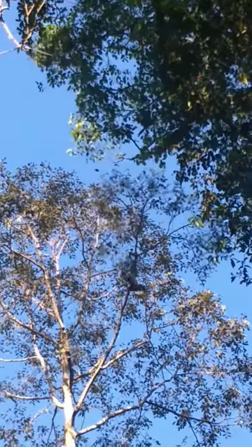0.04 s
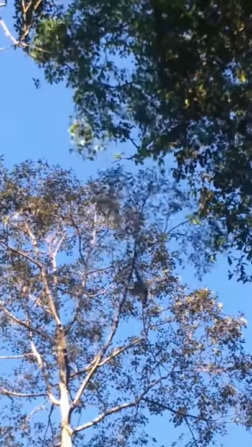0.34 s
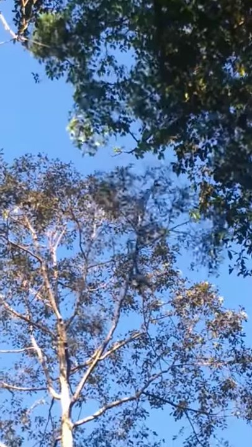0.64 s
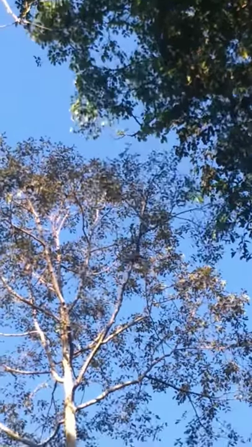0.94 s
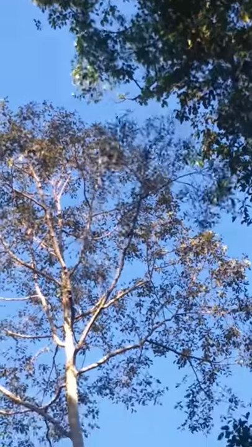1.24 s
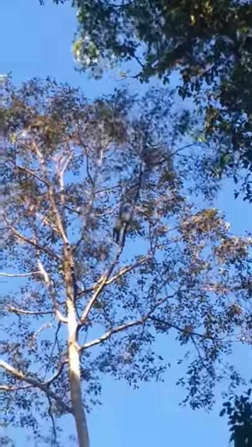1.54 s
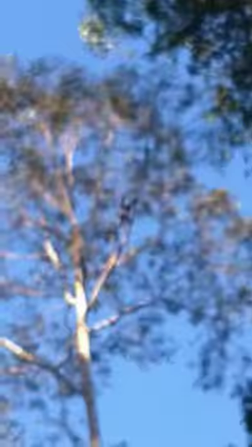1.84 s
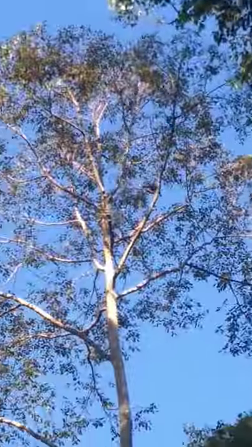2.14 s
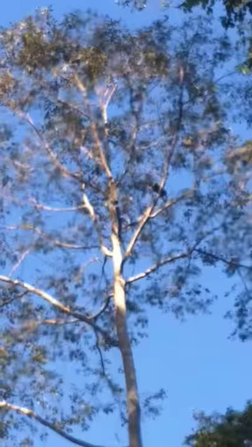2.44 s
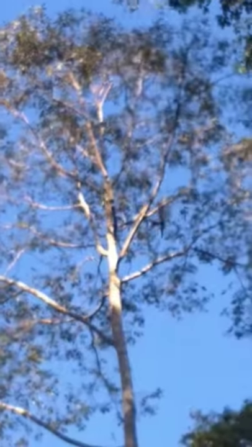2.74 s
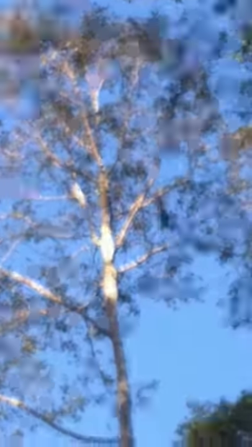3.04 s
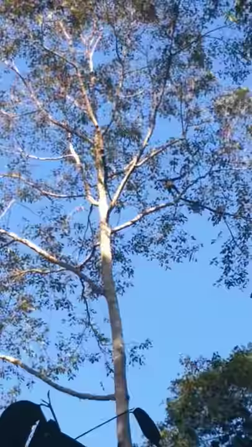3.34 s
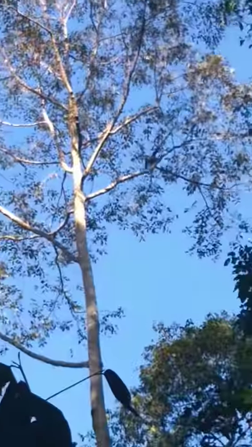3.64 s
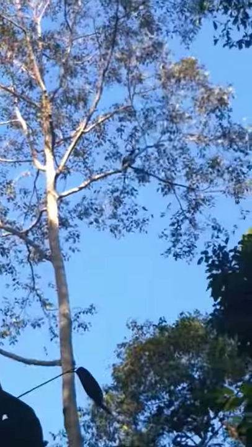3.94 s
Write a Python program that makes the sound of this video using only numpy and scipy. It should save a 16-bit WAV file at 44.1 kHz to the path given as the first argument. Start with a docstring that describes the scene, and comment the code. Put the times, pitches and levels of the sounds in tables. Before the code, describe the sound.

A dense, high cicada drone, near and far, grows fuller and then holds steady among tropical trees. Soft rustling and scraping in the undergrowth give way to light twig snaps and one dry handling click at the microphone.

```python
"""A tropical forest, droning with cicadas: each clicks its ribbed drums some 200 times a second,
ringing its body, and throbs about 8 times a second. One sings close by and a few further off, one of
them wavering; a chorus and a latecomer swell during the first second. Below lie a faint hush,
crickets, dull rustles, hollow tones, scrapes and twig ticks. The two microphone channels are out of
step; near the end the camera's shell clicks once in both."""
import sys
import numpy as np
from scipy.fft import rfft, irfft, next_fast_len
from scipy.io import wavfile
from scipy.ndimage import map_coordinates

SR = 44100
rng = np.random.default_rng(int(sys.argv[2]) if len(sys.argv) > 2 else 0)


def output_pcm(signal):
    """Save a mono or channel-first signal as 16-bit PCM at the path in sys.argv[1].

    Samples are clipped to [-1, 1] before scaling.
    """
    pcm = np.clip(np.atleast_2d(signal).T, -1, 1) * 32767
    wavfile.write(sys.argv[1], SR, np.round(pcm).astype(np.int16))


N = 176400


def amp(db):
    """Decibels to gain."""
    return 10 ** (np.asarray(db) / 20)


def unit(x):
    """Scale to rms 1."""
    return x / np.sqrt(np.mean(x ** 2) + 1e-20)


def along(points, hz):
    """Interpolate (freq_hz, value) points on a log axis."""
    freqs, values = np.transpose(points)
    return np.interp(np.log(hz + 1), np.log(freqs + 1), values)


def clock():
    """Sample times in seconds."""
    return np.arange(N) / SR


def curve(rows):
    """Interpolate (time_s, value) points at every sample."""
    return np.interp(clock(), *np.transpose(rows))


def wobble(rate_hz):
    """Smooth random curve, rate_hz knots a second."""
    return map_coordinates(rng.standard_normal(4096), [clock() * rate_hz + 2], mode="mirror")


def decay(age_s, t60_s):
    """Exponential decay, floored at -120 dB."""
    return amp(-60 * np.minimum(age_s / t60_s, 2))


def filtered(x, response):
    """Apply a complex frequency response."""
    size = next_fast_len(N + SR // 2)
    return irfft(rfft(x, size) * response(np.fft.rfftfreq(size, 1 / SR)), size)[..., :N]


def coloured(x, spectrum):
    """Shape by (freq_hz, gain_db) points; rms 1."""
    return unit(filtered(x, lambda hz: amp(along(spectrum, hz))))


def resonant(x, centre_hz, width_hz):
    """Two identical band-passes in series."""
    def band(hz):
        return 1j * hz * width_hz / (centre_hz ** 2 - hz * hz + 1j * hz * width_hz)
    return filtered(x, lambda hz: band(hz) ** 2)


def noise():
    """White noise: the part both channels share, and the part in which they differ."""
    return rng.standard_normal((2, N))


def forest(x, wet_db, t60_s=.4):
    """Direct sound plus scatter from trunks and leaves: shared and differing parts, each at rms 1."""
    t = np.arange(SR // 2) / SR
    tail = rng.standard_normal((2, len(t))) * amp(-60 * t / t60_s)
    tail /= np.linalg.norm(tail[0])
    wet = irfft(rfft(x) * rfft(tail, N), N)
    return np.array([unit(x + amp(wet_db) * wet[0]), unit(wet[1])])


def drum_clicks(rate_hz, envelope, jitter_s=4e-6, spread_db=1.3):
    """Clicks of a cicada's ribbed drums, slightly uneven in time and strength."""
    cycles = rng.random() + np.cumsum(rate_hz) / SR
    timing, force = rng.standard_normal((2, 2048))
    at = np.interp(np.arange(1, int(cycles[-1])), cycles, np.arange(N))
    at = np.clip(at + jitter_s * SR * timing[:len(at)], 0, N - 1)
    taps = at.astype(int)[:, None] + np.arange(-7, 9)
    offset = taps - at[:, None]
    pulse = np.sinc(offset) * np.cos(np.pi * offset / 16) ** 2  # lands between samples
    strength = envelope[at.astype(int)] * amp(spread_db * force[:len(at)])
    return np.bincount((taps % N).ravel(), (pulse * strength[:, None]).ravel(), N)


def singer(rate_hz, drift=.002, throb_hz=7.8, depth_db=1.45, bend=.0007):
    """One cicada's clicks: each throb makes them louder and a little faster."""
    cycles = throb_hz * rng.uniform(.9, 1.1) * clock() + rng.random() + .13 * wobble(1.97)
    throb = np.sin(2 * np.pi * cycles)
    return drum_clicks(rate_hz * (1 + bend * throb + drift * wobble(5)), amp(depth_db * throb))


def crowd(spectrum, count, speedup_per_s=.004):
    """Several insects at their own click rates, all slowly speeding up."""
    rates_hz = rng.uniform(195, 265, count)
    speedup = 1 + speedup_per_s * clock()
    voices = sum(forest(singer(hz * speedup), wet_db=3) for hz in rates_hz)
    return coloured(voices, spectrum)


# Throbs: peak_s, relative_db
NEAR_THROBS = [(0.056, -38.0), (0.165, -39.8), (0.294, -37.5), (0.415, -37.9), (0.587, -38.3),
               (0.708, -38.9), (0.802, -38.2), (0.931, -36.3), (1.058, -37.6), (1.168, -38.6),
               (1.317, -39.1), (1.448, -38.5), (1.575, -36.7), (1.71, -38.5), (1.843, -38.4),
               (1.982, -37.3), (2.088, -36.8), (2.22, -40.7), (2.374, -40.1), (2.482, -39.1),
               (2.617, -39.4), (2.743, -38.9), (2.867, -39.5), (3.006, -38.7), (3.116, -38.9),
               (3.284, -35.8), (3.411, -38.4), (3.507, -37.8), (3.652, -38.4), (3.774, -36.8),
               (3.943, -37.1)]
# Click rate: time_s, rate_hz
NEAR_RATE = [(0, 241.4), (4, 242.0)]


def near_cicada(throb_width_s=.026, boost_db=2.5, floor_db=-40, bend=.0025):
    """Clicks drive a nearly pure body ring that swells and bends up with each throb."""
    humps = [np.exp(-.5 * ((clock() - peak_s) / throb_width_s) ** 2) for peak_s, _ in NEAR_THROBS]
    throbs = sum(hump * amp(db + boost_db) for hump, (_, db) in zip(humps, NEAR_THROBS))
    envelope = np.hypot(amp(floor_db), throbs)
    rate_hz = curve(NEAR_RATE) * (1 + bend * (sum(humps) - .7))
    ring = resonant(drum_clicks(rate_hz, envelope), centre_hz=5591, width_hz=160)
    return np.sqrt(np.mean(envelope ** 2)) * forest(ring, wet_db=-16)


# Click rates, one row per cicada: start_hz, end_hz
CLICK_RATES = [(220.8, 224.8), (269.5, 269.3), (211.9, 212.9), (219.0, 223.2)]
# Rate wander, same order: drift_fraction
RATE_DRIFTS = [.0016, .001, .0013, .0028]
# Bodies, same order: resonance_hz, width_hz, level_db
BODIES = [(5320, 120, -46), (5480, 230, -46.5), (5503, 170, -43), (6447, 540, -39)]


def neighbours():
    """Four cicadas in nearby trees, each ringing its own body."""
    out = np.zeros((2, N))
    for (start_hz, end_hz), drift, (hz, width_hz, db) in zip(CLICK_RATES, RATE_DRIFTS, BODIES):
        clicks = singer(np.linspace(start_hz, end_hz, N), drift)
        out += amp(db) * forest(resonant(clicks, hz, width_hz), wet_db=4)
    return out


# Centre click rate: time_s, rate_hz
WAVERING_RATE = [(0, 235.6), (1.2, 236.1), (2.4, 237.6), (4, 237.6)]


def wavering_cicada(swing_fraction=.005, period_s=.507, crest_s=.45):
    """The click rate swings twice a second, carrying the ringing tones along."""
    swing = swing_fraction * np.cos(2 * np.pi * (clock() - crest_s) / period_s)
    clicks = singer(curve(WAVERING_RATE) * (1 + swing))
    return amp(-36) * forest(resonant(clicks, centre_hz=6412, width_hz=790), wet_db=4)


# Chorus swell: time_s, level_db
CHORUS_SWELL = [(0, -48), (.55, -50), (.85, -37.5), (1.5, -37.5), (2.5, -36.5), (4, -35.5)]
# Chorus colour: freq_hz, gain_db
CHORUS_SPECTRUM = [(3500, -58), (4600, -65), (5100, -18.5), (5400, -6), (5650, -13.5), (5900, -19),
                   (6200, -1.5), (6500, 3), (6800, -10.5), (7200, -13), (7800, -19), (8600, -28),
                   (10000, -37), (12000, -61)]


def chorus():
    """Massed cicadas swell during the first second."""
    return amp(curve(CHORUS_SWELL)) * crowd(CHORUS_SPECTRUM, count=4)


# Buzz colour: freq_hz, gain_db
BUZZ_SPECTRUM = [(7500, -69), (8800, -3.5), (9250, -4), (9550, 0), (9900, -8), (10500, -9.5), (11100, -10),
                 (11800, -36), (15000, -39)]


def buzzers():
    """Clicking insects with a thin, higher buzz."""
    return amp(-46.5) * crowd(BUZZ_SPECTRUM, count=4)


# Hiss colour: freq_hz, gain_db
FAR_SPECTRUM = [(2500, -83), (4200, -13), (4900, -17.5), (5500, 7), (6500, -4.5), (7500, -5.5),
                (8700, -7.5), (10200, -5.5), (11300, -17.5), (12500, -20.5), (13500, -23), (15500, -28)]


def far_insects(level_db=-40.5, flicker_db=.32):
    """Countless far insects blur into a hiss."""
    return amp(level_db + flicker_db * wobble(17)) * coloured(noise(), FAR_SPECTRUM)


# Hush colour: freq_hz, gain_db
HUSH_SPECTRUM = [(20, 2), (45, -15), (66, 8), (88, -1), (115, -0.5), (170, -2), (300, -2.5), (500, -2.5),
                 (800, -0.5), (1300, -4), (1800, -8.5), (2500, -9), (4200, -10), (6000, -9.5), (15000, -35)]


def hush(level_db=-53, flicker_db=.8):
    """Faint, broad forest noise."""
    return amp(level_db + flicker_db * wobble(25.12)) * coloured(noise(), HUSH_SPECTRUM)


# Insect whine: time_s, pitch_hz, level_db
WHINE_TRACK = [(0, 9570, -59), (1.9, 9560, -57), (2.1, 9490, -55.5), (2.4, 9480, -56), (2.6, 9470, -68),
               (4, 9470, -74)]


def whine():
    """One insect holds a thin, slowly sinking tone, then fades."""
    time_s, hz, db = np.transpose(WHINE_TRACK)
    pitch_hz = np.interp(clock(), time_s, hz) * (1 + .000675 * wobble(18))
    tone = np.sin(2 * np.pi * np.cumsum(pitch_hz) / SR)
    return amp(np.interp(clock(), time_s, db)) * forest(tone, wet_db=14)


# Cricket tones: pitch_hz, level_db
CRICKET_TONES = [(4447, -57), (4780, -62.5)]


def crickets():
    """Distant crickets: faint, unsteady tones pitched below the cicadas."""
    return sum(amp(db) * unit(resonant(noise(), hz, width_hz=55)) for hz, db in CRICKET_TONES)


# Rustle envelope: time_s, level_db
RUSTLE_ENVELOPE = [(0, -44), (.08, -45.5), (.13, -42), (.27, -44), (.33, -44.5), (.43, -49), (.49, -45),
                   (.55, -57), (.61, -56.5), (.66, -46.5), (.71, -50), (.77, -66), (.88, -54.5),
                   (1.15, -76), (2, -68), (2.3, -56), (2.8, -57.5), (3.2, -63), (4, -71)]
# Rustle colour: freq_hz, gain_db
RUSTLE_SPECTRUM = [(100, -33), (300, -13.5), (500, -6.5), (750, -2), (1050, -1), (1500, -8), (2000, -12),
                   (2800, -17.5), (4000, -19.5), (8000, -49)]


def rustles():
    """Dull, crumbly rustling: noise with a fast-flickering level."""
    grains = noise() * amp(1.06 * wobble(110) + .86 * wobble(400))
    return amp(curve(RUSTLE_ENVELOPE)) * coloured(grains, RUSTLE_SPECTRUM)


# Tones in the rustling: centre_s, length_s, start_hz, end_hz, level_db
HOLLOW_TONES = [(.235, .13, 845, 755, -42), (.225, .17, 640, 675, -48.5), (.42, .12, 735, 860, -44),
                (.565, .05, 660, 675, -52), (.915, .13, 670, 640, -58), (1.035, .19, 640, 600, -57),
                (1.17, .1, 585, 565, -63)]


def hollow_tones(waver_fraction=.015, breakup_db=3):
    """Short, broken, gliding tones, blurred by the trees."""
    out = np.zeros(N)
    for centre_s, length_s, start_hz, end_hz, db in HOLLOW_TONES:
        progress = np.clip((clock() - centre_s) / length_s + .5, 0, 1)
        pitch_hz = (start_hz + (end_hz - start_hz) * progress) * (1 + waver_fraction * wobble(132))
        envelope = amp(db + breakup_db * wobble(71.4)) * np.sin(np.pi * progress)
        out += envelope * np.sin(2 * np.pi * np.cumsum(pitch_hz) / SR)
    return out.std() * forest(out, wet_db=-4)


# Drags: peak_s, rise_s, fall_s, level_db
SCRAPE_STROKES = [(0.485, 0.028, 0.028, -48), (1.71, .11, 0.065, -48.5)]
# Scrape colour: freq_hz, gain_db
SCRAPE_SPECTRUM = [(120, -23), (280, 1), (450, -1), (900, -1.5), (1200, 2), (1430, 7), (1700, -3.5),
                   (2200, -3), (4000, -15), (8000, -46)]


def scrapes():
    """Something drags softly through the undergrowth, twice."""
    t = clock()
    envelope = np.zeros(N)
    for peak_s, rise_s, fall_s, db in SCRAPE_STROKES:
        width_s = np.where(t < peak_s, rise_s, fall_s)
        envelope += amp(db) * np.exp(-.5 * ((t - peak_s) / width_s) ** 2)
    return envelope * coloured(noise() * amp(.94 * wobble(140)), SCRAPE_SPECTRUM)


# Click rate: time_s, rate_hz
LATECOMER_RATE = [(0, 197.0), (1.2, 197.8), (1.8, 198.9), (2.4, 199.6), (4, 200.4)]
# Entry swell: time_s, level_db
LATECOMER_SWELL = [(0, -60), (.55, -59), (.85, -37), (2.2, -40.5), (4, -38.5)]
# Song colour: freq_hz, gain_db
LATECOMER_SPECTRUM = [(4000, -53), (5000, -16.5), (5700, -5.5), (6100, -6.5), (6400, -0.5), (6750, -4.5),
                      (7000, -7), (7400, -9), (8000, -15.5), (9000, -26), (12000, -43)]


def latecomer():
    """A slower-clicking, brighter cicada joins in and holds steady tones."""
    clicks = singer(curve(LATECOMER_RATE), drift=.0017)
    return amp(curve(LATECOMER_SWELL)) * coloured(forest(clicks, wet_db=4), LATECOMER_SPECTRUM)


# Twigs: start_s, level_db, resonance_hz, width_hz, t60_s
TWIG_TICKS = [(2.228, -45, 990, 900, 0.044), (2.269, -34, 1490, 2570, 0.027),
              (2.371, -42, 1540, 2220, 0.07), (2.45, -40.5, 1260, 420, 0.057),
              (2.565, -48, 1190, 1200, 0.04), (2.728, -40.5, 1540, 2080, 0.054),
              (3.089, -45, 1290, 900, 0.034)]


def twig_ticks(snap_db=-1, attack_s=.00012):
    """Twigs give way: a brief snap and a short woody ring."""
    out = np.zeros((2, N))
    for start_s, db, hz, width_hz, t60_s in TWIG_TICKS:
        age_s = np.maximum(clock() - start_s, 0)
        ring = decay(age_s, t60_s) * unit(resonant(noise(), hz, width_hz))
        snap = decay(age_s, t60_s=.008) * unit(resonant(noise(), centre_hz=2370, width_hz=3800))
        out += amp(db) * (1 - np.exp(-age_s / attack_s)) * (ring + amp(snap_db) * snap)
    return out


# Click colour: freq_hz, gain_db
SHELL_SPECTRUM = [(300, -20), (900, -13), (1500, 5), (3000, -2), (5000, 0), (9000, -24)]


def shell_click(start_s=3.422, click_db=-37.5, bump_db=-61, bump_hz=50):
    """A dry click and a soft bump in the camera's shell reach both channels at once."""
    age_s = np.maximum(clock() - start_s, 0)
    click = (age_s > 0) * decay(age_s, t60_s=.0098) * coloured(noise()[0], SHELL_SPECTRUM)
    bump = decay(age_s, t60_s=.16) * np.sin(2 * np.pi * bump_hz * age_s)
    return amp(click_db) * click + amp(bump_db) * bump


# Channel likeness: freq_hz, likeness (clipped to 0-1)
LIKENESS = [(60, 0.92), (170, 0.43), (300, 0.6), (600, 0.88), (1400, 1.05), (1900, 0.42), (3400, 3.5),
            (5200, 0.22), (5600, 1.13), (6500, 0.82), (10000, 1.1), (15000, 0)]
# Channel balance: freq_hz, left_minus_right_db
BALANCE = [(100, 0), (700, -1), (1500, -1), (4800, -0.5), (5550, 0), (6500, -2.5), (7800, 0), (9600, 2.5),
           (13000, 0.5)]
# Pull towards in or out of phase: freq_hz, pull_rad
PHASE_PULL = [(1000, 0.89), (4500, 0.12), (7000, 0.023), (12000, 0.054)]
# Pull into step: freq_hz, offset_removed_fraction
ALIGNMENT = [(150, 0.018), (270, 0.89), (1700, 0.31), (1950, 0.0039)]


def microphones(parts, lag_s=.000437):
    """Shared and differing parts to stereo; the right is inverted and lags, less so in the low mids."""
    def blend(hz):
        angle = np.arccos(np.clip(along(LIKENESS, hz), 0, 1)) / 2
        return np.array([np.cos(angle), np.sin(angle)])

    def offset(hz):
        phase = np.pi + 2 * np.pi * hz * lag_s
        phase -= along(PHASE_PULL, hz) * np.sin(2 * phase)
        phase += along(ALIGNMENT, hz) * (2 * np.pi - phase)
        half = np.array([[.5], [-.5]])
        return amp(half * along(BALANCE, hz)) * np.exp(1j * half * phase)
    shared, apart = filtered(parts, blend)
    return filtered(np.array([shared + apart, shared - apart]), offset)


def scene():
    """Insects near and far over the forest floor."""
    bed = chorus() + buzzers() + far_insects() + hush()
    cicadas = near_cicada() + neighbours() + wavering_cicada() + latecomer()
    thin_tones = whine() + crickets()
    floor = rustles() + hollow_tones() + scrapes() + twig_ticks()
    return microphones(bed + cicadas + thin_tones + floor) + shell_click()


def record(dry):
    """Brick-wall low-pass."""
    top_hz = 15700
    return filtered(dry, lambda hz: hz < top_hz)


dry = scene()
out = record(dry)
output_pcm(out)
```